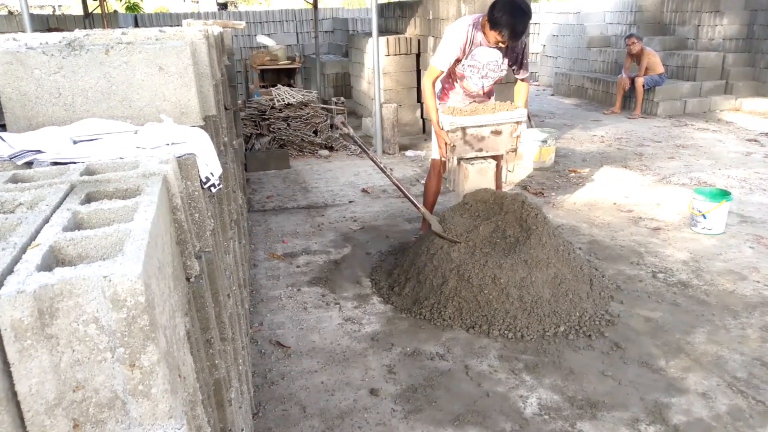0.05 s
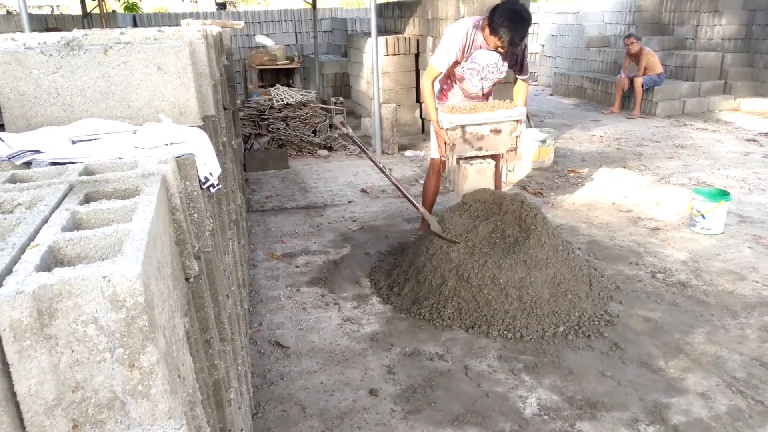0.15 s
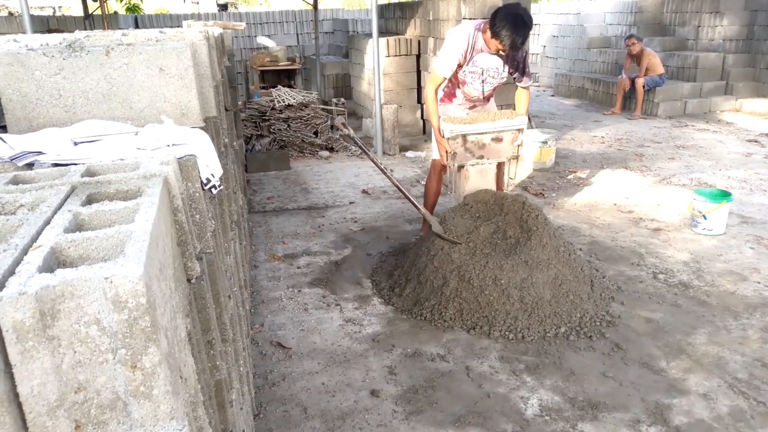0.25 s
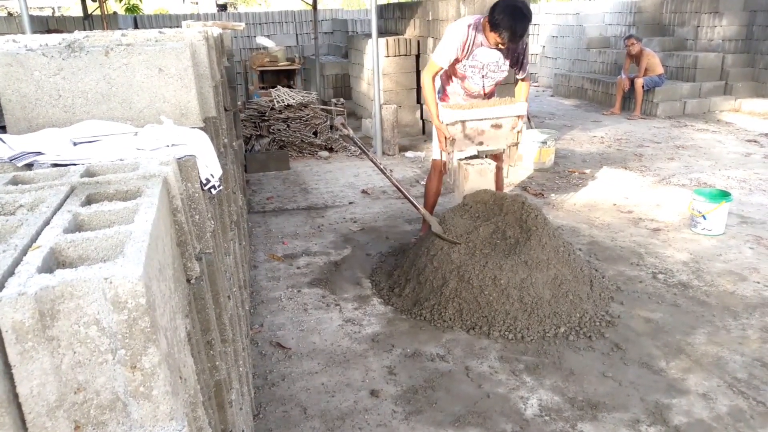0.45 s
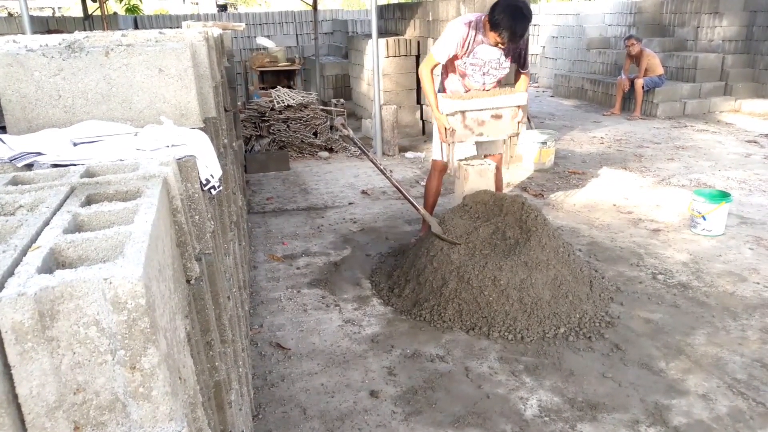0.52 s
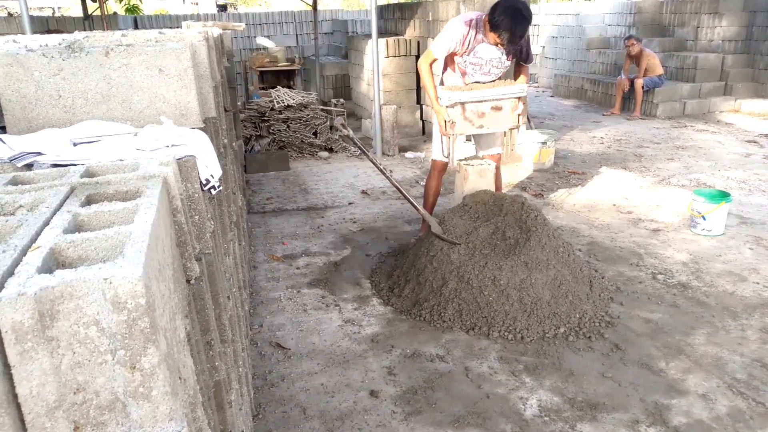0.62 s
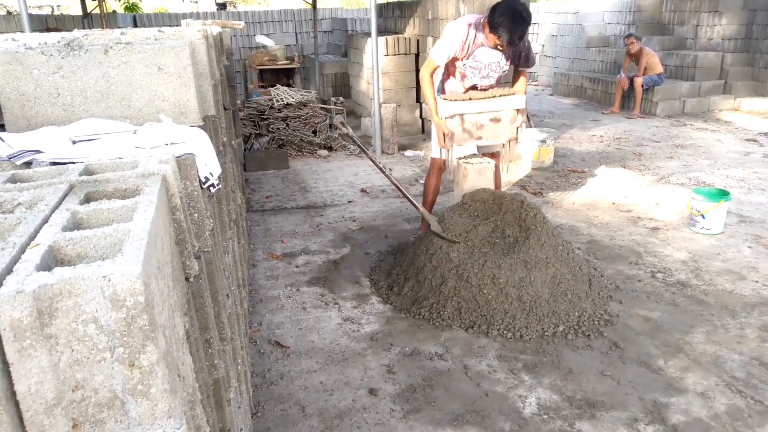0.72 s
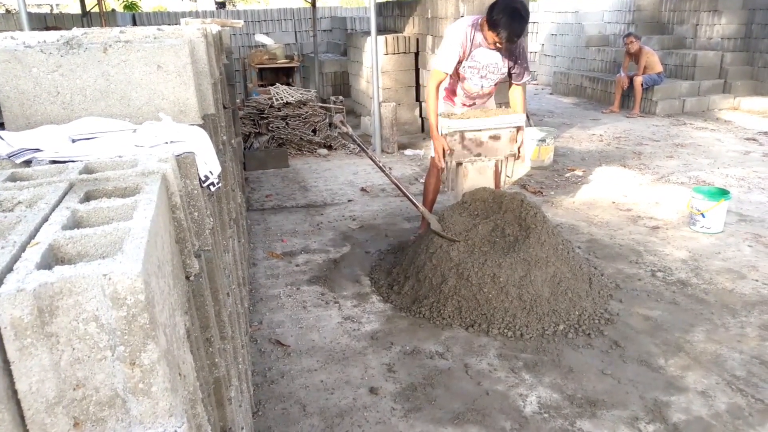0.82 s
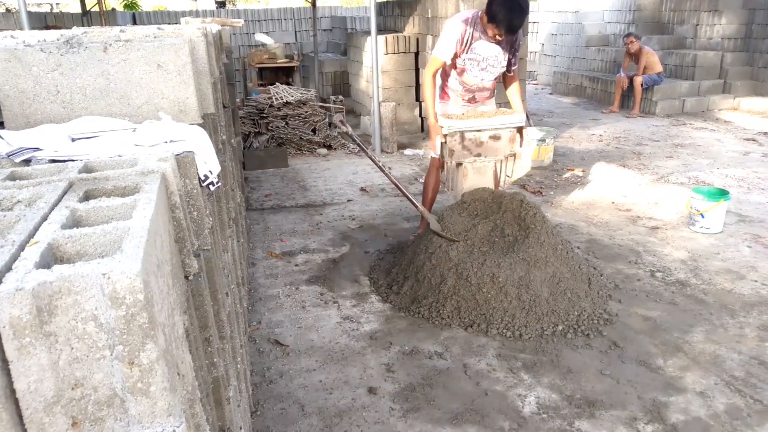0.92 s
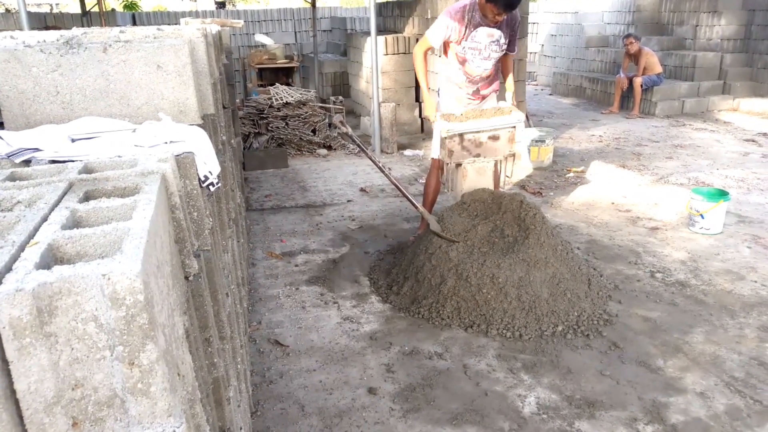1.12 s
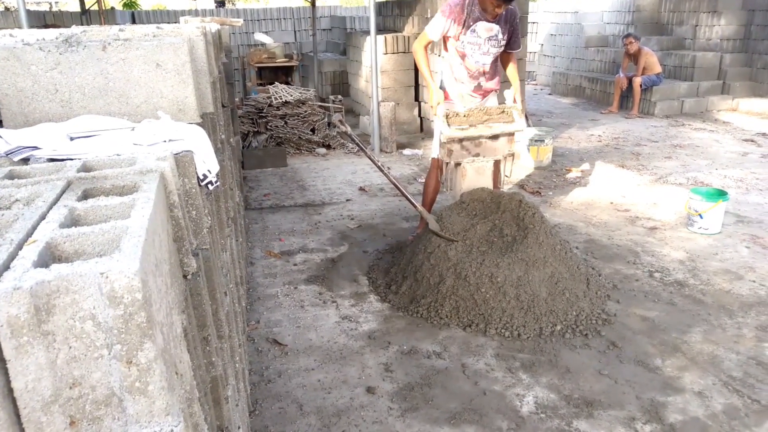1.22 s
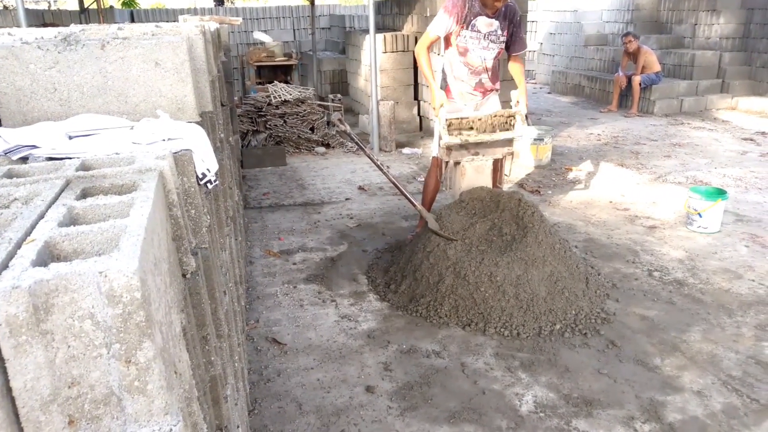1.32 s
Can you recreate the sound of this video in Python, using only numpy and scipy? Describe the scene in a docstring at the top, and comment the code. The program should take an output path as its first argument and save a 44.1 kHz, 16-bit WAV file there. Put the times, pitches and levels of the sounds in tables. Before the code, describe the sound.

Hard knock of a concrete block mould after a short sandy scrape, with faint bird chirps.

```python
"""A quiet yard between stacks of concrete blocks, heard through one microphone.
In front, a block mould is worked by hand: it scrapes over gritty mortar and bumps, then lands
with a hard knock that sets it ringing; sand rustles and cracks as it is lifted.
The walls throw the knocks back, and a small bird chips over faint, steady, distant noise."""
import sys
import numpy as np
from scipy import signal
from scipy.io import wavfile
from scipy.ndimage import uniform_filter1d

SR = 44100
rng = np.random.default_rng(int(sys.argv[2]) if len(sys.argv) > 2 else 0)


def generate_wav(sig):
    """Save sig (samples, or channels by samples) to the path in sys.argv[1] as 16-bit PCM at SR."""
    pcm = np.round(np.clip(np.atleast_2d(sig).T, -1, 1) * 32767).astype(np.int16)
    wavfile.write(sys.argv[1], SR, pcm)


N = 59535
T = np.arange(N) / SR

# knocks of the mould: t/s, thud level/dB, thud f/Hz, ring level/dB, ring pitch ratio, ring length/s,
# clatter level/dB, crunch level/dB
MOULD_KNOCKS = [(0.2353, -46, 307, -35.5, 0.98, 0.037, -46, -49),
                (0.26, -54, 298, -38, .915, 0.037, -49, -54),
                (0.3408, -25, 254, -31, 0.705, 0.0052, -37, -31.5),
                (.8864, -13.5, 264, -12.5, 1.001, 0.012, -25, -24.5),
                (0.8915, -35.5, 200, -37, 0.93, 0.015, -30.5, -24),
                (.9095, -31, 318, -24.5, 1.08, 0.0067, -35.5, -53),
                (0.943, -40, 345, -33, 0.942, 0.009, -53, -66)]
# modes of the whole mould: f/Hz, relative level/dB, t60/s
MOULD_MODES = [(170, -10.5, 0.052), (402, -12.5, 0.23), (510.5, -5.5, 0.071), (640, -8.5, 0.32),
               (850, -15, 0.07), (830, 4.5, 0.17), (964, -11, 0.11), (1000, -21.5, 0.073),
               (1160, -18.5, 0.14), (1324, -20, .12), (1528, -4.5, 0.073), (1916, -6.5, 0.33),
               (2090, -9, 0.13), (4280, -19, 0.069)]
# spectrum of the loose parts that clatter at a knock: f/Hz, relative level/dB
CLATTER_SPECTRUM = [(30, -36), (100, -17), (180, -3.5), (400, -0.5), (580, -3.5), (900, 1), (1300, -5.5),
                    (2100, -5.5), (2800, -12.5), (5000, -25.5), (16000, -41)]
# spectrum of the mould's wall under the scrape: f/Hz, relative level/dB
SCRAPE_SPECTRUM = [(40, -50), (150, -13), (350, 0), (520, -8), (800, -7), (1100, 1), (2000, 4.5), (3200, 1),
                   (4500, 5), (8000, -10.5), (16000, -58)]
# sand rubbing as the mould is moved: start t/s, end t/s, level/dB
SAND_RUBS = [(0.834, 0.914, -54.5), (0.975, 1.1, -65), (1.191, 1.276, -58.5), (1.31, 1.377, -54)]
# single bits of grit cracking: t/s, level/dB
GRIT_CRACKS = [(.263, -24.5), (.912, -29), (0.925, -30.5), (.941, -38), (1.028, -44.5), (1.076, -59),
               (1.15, -57.5), (1.179, -49), (1.248, -51.5)]
# spectrum of crushed sand: f/Hz, relative level/dB
GRIT_SPECTRUM = [(100, -80), (2000, -25.5), (3800, -20), (5600, -8.5), (7300, -10.5), (8700, 1.5),
                 (10000, -0.5), (11500, -1), (13300, -8.5), (15200, -19), (16200, -44.5)]
# high modes of the mould's thin walls: f/Hz, relative level/dB
THIN_WALL_MODES = [(8010, 13.5), (8978, -12), (9277, 4.5), (9460, -1), (9950, 0), (10180, 7), (10385, 7),
                   (10835, 5), (11075, -1), (11345, 5)]
# the bird's chips: t/s, length/s, top f/Hz, level/dB at the beak's resonance
BIRD_CHIPS = [(0.174, 0.005, 7030, -47), (0.186, 0.0059, 6690, -44.5), (0.193, 0.0062, 6570, -44),
              (0.444, 0.0064, 6490, -44), (0.699, .006, 7200, -52.5), (0.7133, 0.0031, 6460, -47),
              (1.036, 0.0059, 6710, -44.5), (1.113, 0.0051, 6760, -46.5), (1.1185, 0.0087, 7270, -49),
              (1.237, 0.014, 6230, -43.5), (1.242, 0.0077, 7400, -48), (1.323, 0.0064, 6400, -49)]
# echoes off the yard's walls: delay t/s, level/dB against the direct sound
WALL_ECHOES = [(.0215, -24.5), (.043, -21), (.058, -25.5)]
# reverberation of the yard: f/Hz, t60/s, relative level/dB
YARD_DECAY = [(100, 0.2, -10), (450, 0.32, -4), (830, 0.3, -1), (1250, 0.43, 4), (2230, 0.36, -2.5),
              (4000, 0.48, 2.5), (8900, 0.37, 1.5), (15100, 0.24, -0.5)]
# spectrum of the distant background: f/Hz, relative level/dB
AMBIENCE_SPECTRUM = [(20, -4.5), (60, -3.5), (190, 0), (340, -4.5), (750, -7.5), (1300, -4), (1750, -3.5),
                     (2250, -11.5), (2900, -25), (4200, -25), (5300, -18), (6600, -22), (8000, -15.5),
                     (9800, -13), (12000, -22), (14500, -32), (16000, -54)]


def knocks(thud_peak_s=0.0034, ring_lag_s=0.001998, ring_rise_s=0.0021, low_cut_hz=113):
    """Each knock is a dull thud, a ring that the mortar soon chokes, a clatter and a crunch of sand."""
    body, clatter, crunch = np.zeros((3, N))
    for start, thud_db, thud_hz, ring_db, pitch, ring_s, clatter_db, crunch_db in MOULD_KNOCKS:
        t = np.maximum(T - start, 0)
        swell = (t / thud_peak_s * np.exp(1 - t / thud_peak_s)) ** 6.3
        body += amp(thud_db) * swell * np.sin(2 * np.pi * thud_hz * t)
        ring_t = np.maximum(t - ring_lag_s, 0)
        choke = np.minimum(ring_t / ring_rise_s, 1) * np.exp(-(ring_t / ring_s) ** 2)
        body += amp(ring_db) * mould_ring(ring_t, pitch) * choke / 2
        clatter += amp(clatter_db) * burst(start + ring_lag_s, rise_s=0.0027, fade_s=0.0092)
        crunch += amp(crunch_db) * burst(start + 0.00025, rise_s=0.0022, fade_s=0.01)
    body = signal.sosfilt(signal.butter(2, low_cut_hz, "high", fs=SR, output="sos"), body)
    loose_parts = through(clatter * grains(), colour(CLATTER_SPECTRUM))
    return body + loose_parts + crushed_sand(crunch * grains())


def mould_ring(t, pitch):
    """The mould's modes dying away, t seconds after a blow."""
    return sum(amp(db - 60 * t / t60) * np.sin(2 * np.pi * hz * pitch * t)
               for hz, db, t60 in MOULD_MODES)


def scrape(start_s=0.231, hold_s=0.044, fade_db_per_s=272, bite_s=0.2425, bite_width_s=0.0037):
    """The mould bites, then slides to rest; sand breaks under it and stirs its walls."""
    t = T - start_s
    bite_db = 9.5 * np.exp(-((T - bite_s) / bite_width_s) ** 2 / 2)
    level_db = -26.5 + bite_db - fade_db_per_s * np.maximum(t - hold_s, 0)
    drive = (t > 0) * amp(level_db) * grains()
    return crushed_sand(drive) + amp(-15.5) * through(drive, colour(SCRAPE_SPECTRUM))


def sand_rustle(edge_s=0.056):
    """Sand rubs softly against the moving mould and single bits of grit crack."""
    rub_power = sum(amp(db) ** 2 * np.clip(np.minimum(T - start, end - T) / edge_s + 0.5, 0, 1)
                    for start, end, db in SAND_RUBS)
    crack_power = sum((amp(db) * burst(start, rise_s=0.0011, fade_s=0.0079)) ** 2
                      for start, db in GRIT_CRACKS)
    return crushed_sand(np.sqrt(rub_power + crack_power) * grains())


def crushed_sand(drive, t60_s=0.037):
    """Grains of sand crack and make the mould's thin walls sing briefly."""
    ring = sum(amp(db - 60 * T / t60_s) * np.sin(2 * np.pi * hz * T) for hz, db in THIN_WALL_MODES)
    return through(drive, colour(GRIT_SPECTRUM)) + amp(-11) * through(drive, ring / np.linalg.norm(ring))


def grains(per_s=9000, spread_db=0.5):
    """Dense clicks of uneven size, with steady power over a few milliseconds."""
    size = amp(-spread_db * np.minimum(rng.exponential(1, N), 4)) * rng.choice([-1, 1], N)
    clicks = size * (rng.random(N) < per_s / SR)
    local_power = abs(uniform_filter1d(clicks ** 2, size=260))
    return clicks / np.sqrt(local_power + 1e-6)


def bird(low_hz=5250, rasp_hz=250, beak_hz=6200, beak_width_hz=950):
    """Each chip is a quick, raspy arch of pitch across the beak's resonance, blurred by nearby surfaces."""
    chips = np.zeros(N)
    jitter = unit_rms(uniform_filter1d(rng.standard_normal(N), size=24))
    for start, length, top_hz, db in BIRD_CHIPS:
        arch = np.maximum(np.sin(np.pi * np.clip((T - start) / length, 0, 1)), 0)
        hz = low_hz + (top_hz - low_hz) * arch + rasp_hz * jitter
        beak_gain = 1 / (1 + ((hz - beak_hz) / beak_width_hz) ** 2)
        chips += amp(db) * arch ** 0.6 * beak_gain * np.sin(2 * np.pi * np.cumsum(hz) / SR)
    scatter = rng.standard_normal(N) * burst(0, rise_s=0.004, fade_s=0.008)
    return chips + amp(-6) * through(chips, scatter / np.linalg.norm(scatter))


def wall_echoes(x):
    """Each wall's reflection reaches the microphone later and weaker than the direct sound."""
    return sum(amp(db) * np.pad(x, (round(delay * SR), 0))[:N] for delay, db in WALL_ECHOES)


def yard_reverb(x, build_s=0.0042):
    """Sound scattered by the block stacks, each band dying at its own speed."""
    hz, t, noise = signal.stft(rng.standard_normal(N), SR, nperseg=512)
    t60, db = (at_frequency(np.array(YARD_DECAY)[:, [0, k]], hz)[:, None] for k in (1, 2))
    tail = signal.istft(noise * amp(db - 60 * t / t60), SR)[1][:N]
    tail *= np.minimum(T / build_s, 1)
    return through(x, tail / np.linalg.norm(tail))


def ambience(level_db=-57, patch_db=2.5, swell_db=3, swell_s=0.22):
    """Distant noise that swells a little and then holds, with slight drifting patches."""
    hz, _, bands = signal.stft(rng.standard_normal(N), SR, nperseg=1024, noverlap=768)
    patches = uniform_filter1d(rng.standard_normal(bands.shape), size=10, axis=0)
    patches = unit_rms(uniform_filter1d(patches, size=16, axis=1))
    bands *= amp(at_frequency(AMBIENCE_SPECTRUM, hz)[:, None] + patch_db * patches)
    noise = signal.istft(bands, SR, nperseg=1024, noverlap=768)[1][:N]
    return amp(level_db - swell_db * np.maximum(1 - T / swell_s, 0)) * unit_rms(noise)


def amp(db):
    """Decibels to gain."""
    return 10 ** (np.asarray(db) / 20)


def unit_rms(x):
    """Scales to rms 1."""
    return x / np.sqrt(np.mean(x ** 2) + 1e-20)


def at_frequency(points, hz):
    """Interpolates a table along log frequency."""
    f, value = np.transpose(points)
    return np.interp(np.log(hz + 1), np.log(f), value)


def through(x, response):
    """Plays x through an impulse response."""
    return signal.fftconvolve(x, response)[:N]


def colour(spectrum):
    """Minimum-phase response of energy 1 with the given spectral shape."""
    log_gain = np.log(amp(at_frequency(spectrum, abs(np.fft.fftfreq(4096, 1 / SR)))))
    response = np.fft.ifft(np.exp(np.conj(signal.hilbert(log_gain)))).real[:2048]
    return response / np.linalg.norm(response)


def burst(start, rise_s, fade_s):
    """Envelope that rises to 1 and dies away."""
    t = np.maximum(T - start, 0)
    return np.minimum(t / rise_s, 1) * np.exp(-np.maximum(t - rise_s, 0) / fade_s)


def scene():
    """At the microphone: the mould in front, the bird deeper in the reverberation, distant noise behind."""
    work = knocks() + scrape() + sand_rustle()
    chips = bird()
    mould_in_yard = work + wall_echoes(work) + amp(-14.5) * yard_reverb(work)
    bird_in_yard = chips + amp(-7) * yard_reverb(chips)
    return (mould_in_yard + bird_in_yard + ambience())[None]


def record(dry, cutoff_hz=15900):
    """The recorder's band limit."""
    low_pass = signal.firwin(255, cutoff_hz, window=("kaiser", 9), fs=SR)
    return signal.oaconvolve(dry, low_pass[None], "same")


dry = scene()
out = record(dry)
generate_wav(out)
```